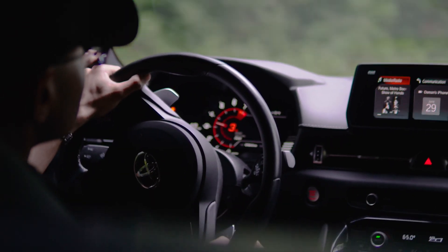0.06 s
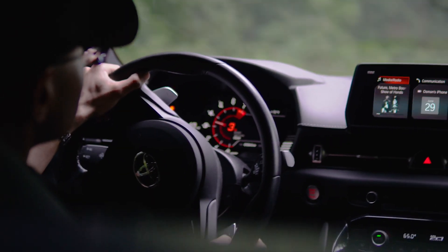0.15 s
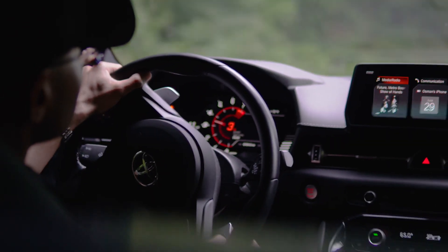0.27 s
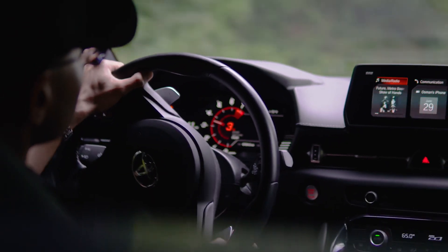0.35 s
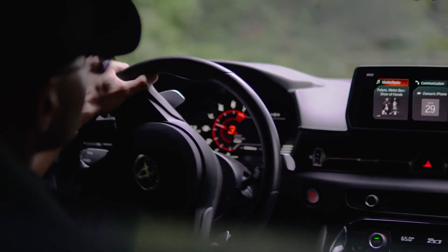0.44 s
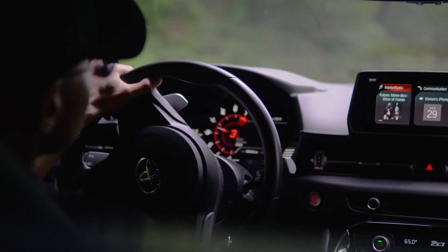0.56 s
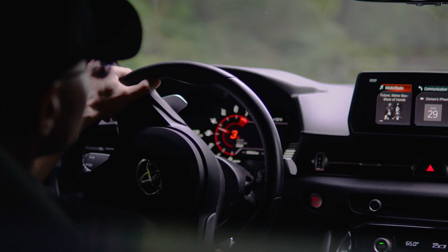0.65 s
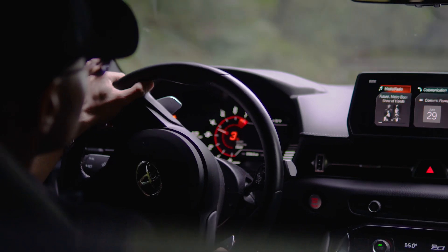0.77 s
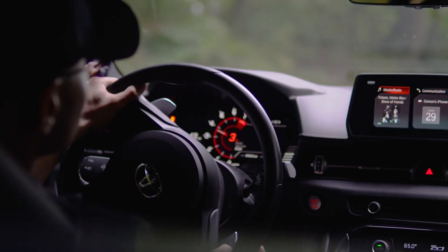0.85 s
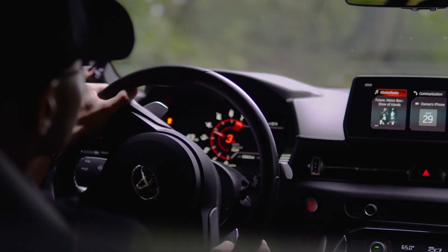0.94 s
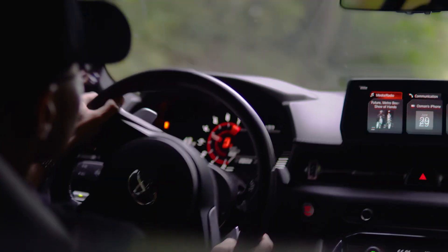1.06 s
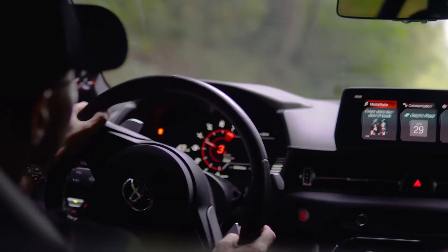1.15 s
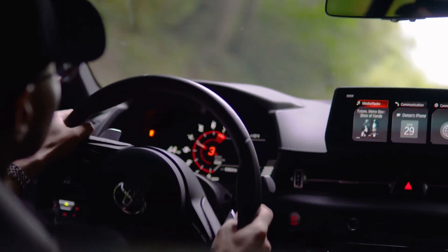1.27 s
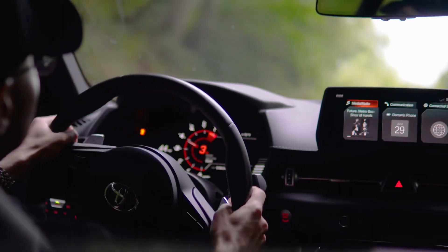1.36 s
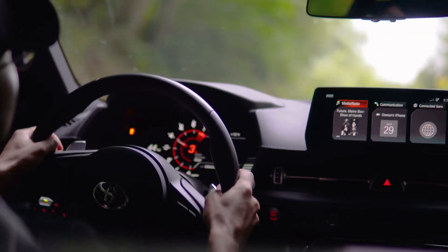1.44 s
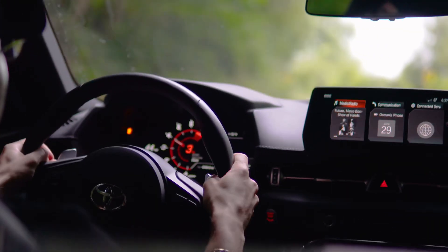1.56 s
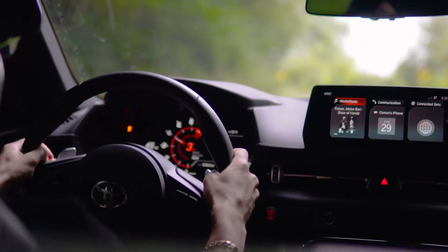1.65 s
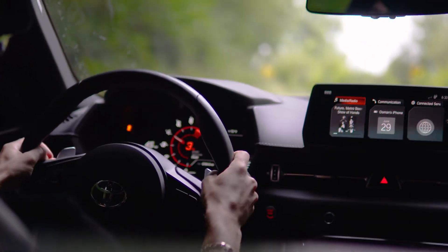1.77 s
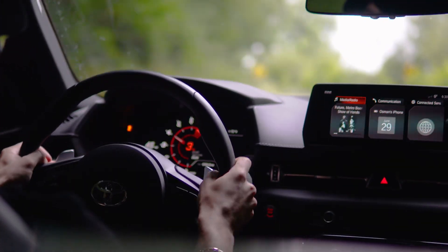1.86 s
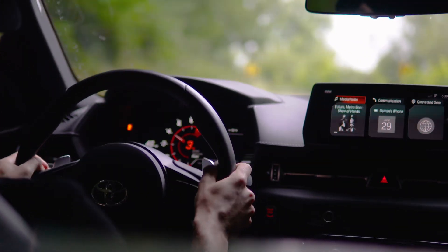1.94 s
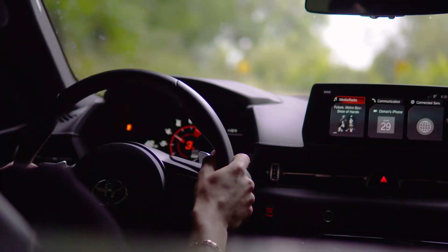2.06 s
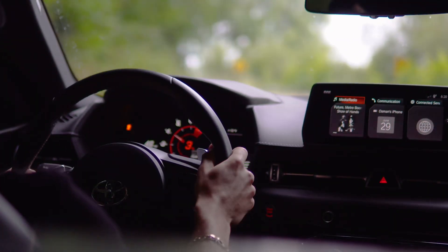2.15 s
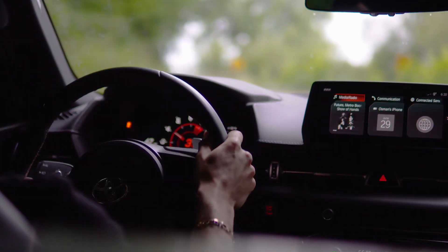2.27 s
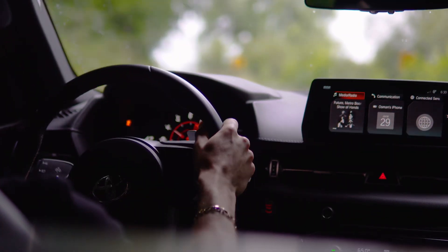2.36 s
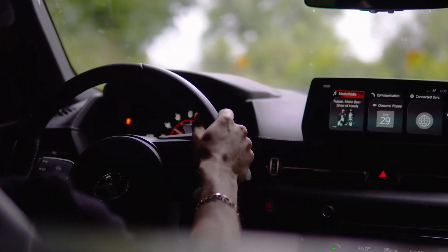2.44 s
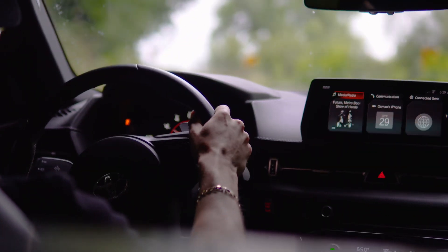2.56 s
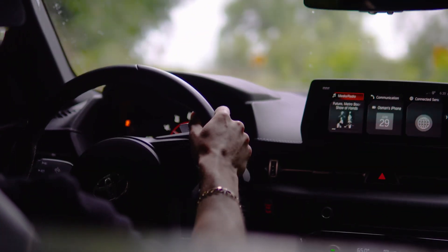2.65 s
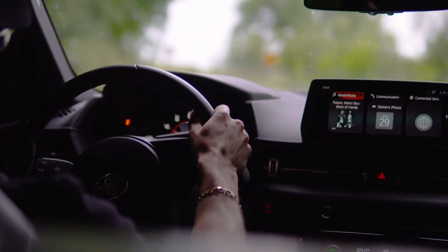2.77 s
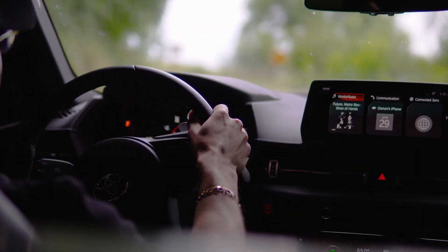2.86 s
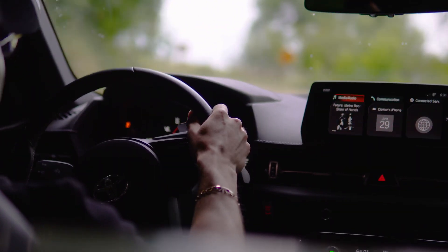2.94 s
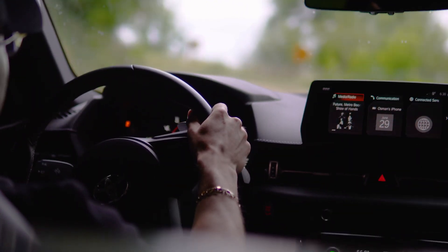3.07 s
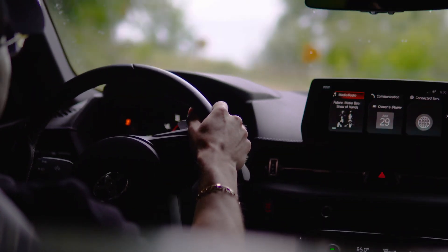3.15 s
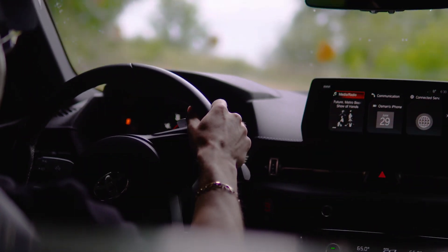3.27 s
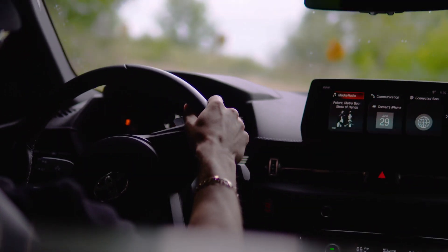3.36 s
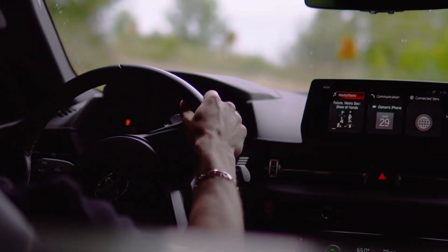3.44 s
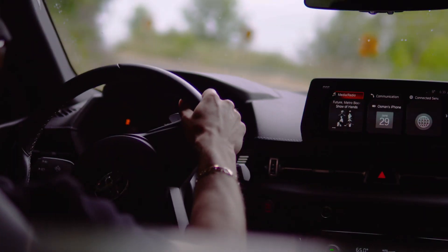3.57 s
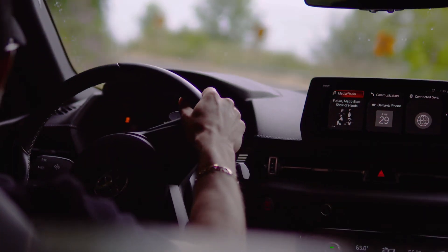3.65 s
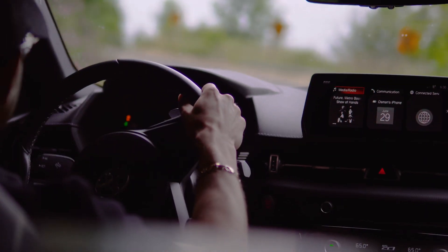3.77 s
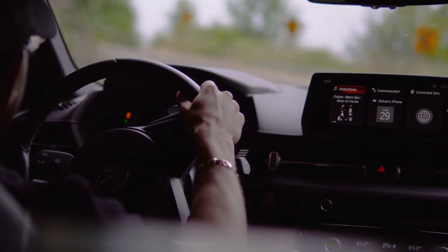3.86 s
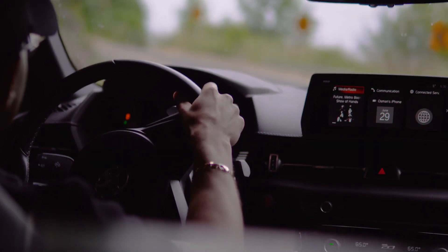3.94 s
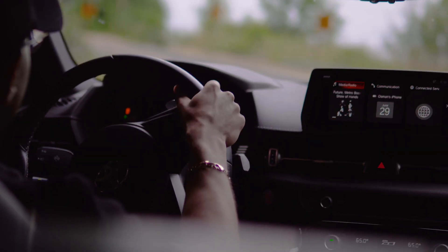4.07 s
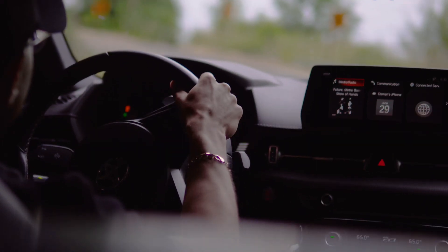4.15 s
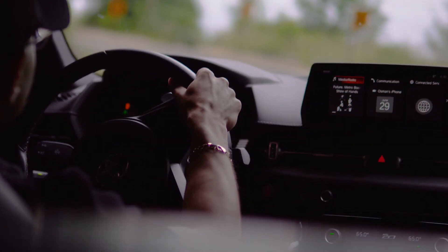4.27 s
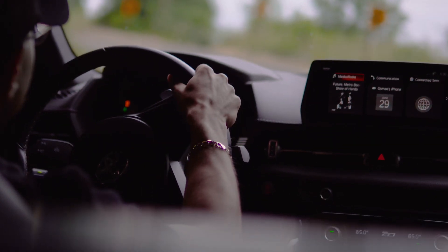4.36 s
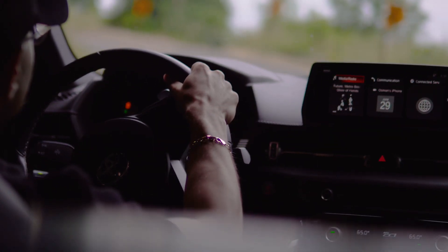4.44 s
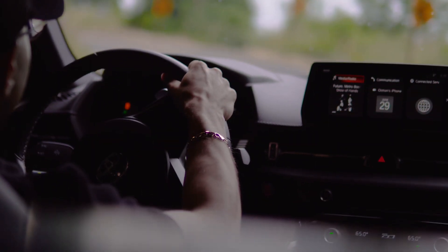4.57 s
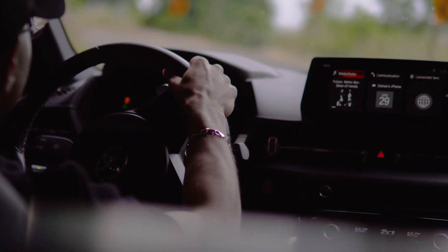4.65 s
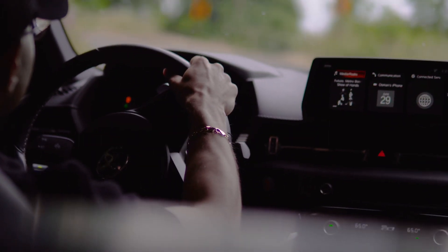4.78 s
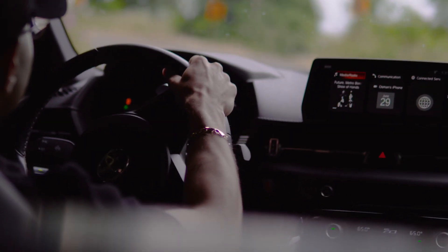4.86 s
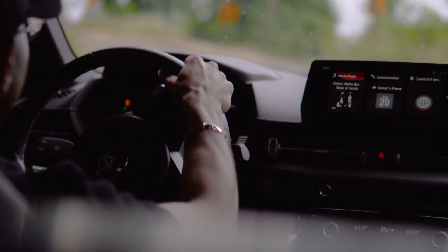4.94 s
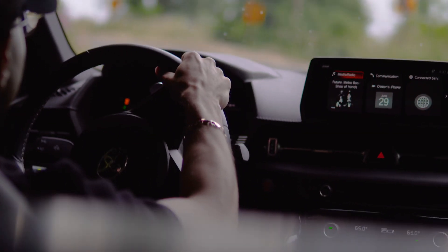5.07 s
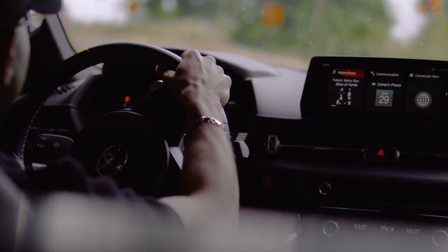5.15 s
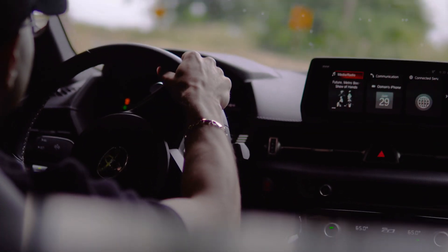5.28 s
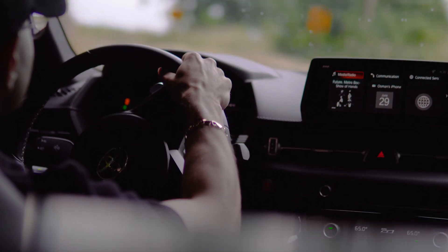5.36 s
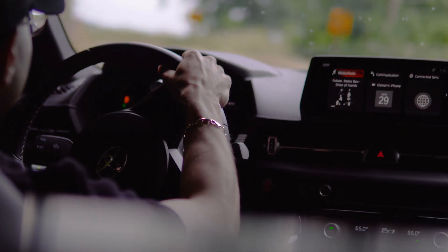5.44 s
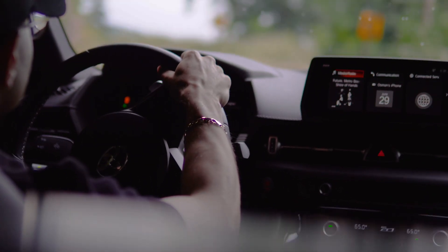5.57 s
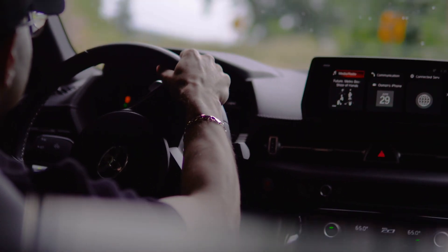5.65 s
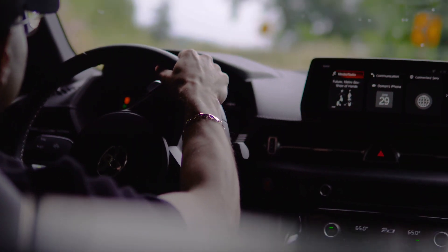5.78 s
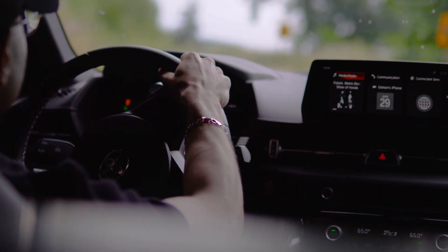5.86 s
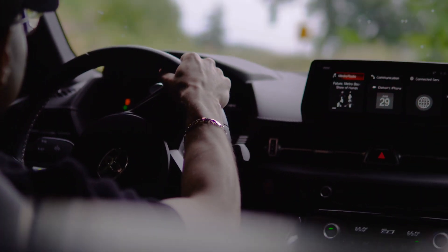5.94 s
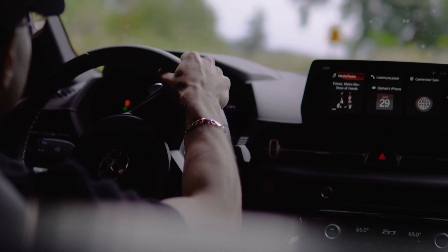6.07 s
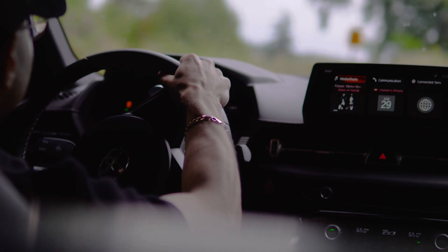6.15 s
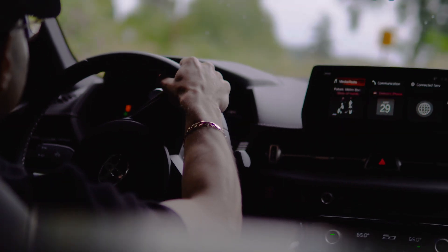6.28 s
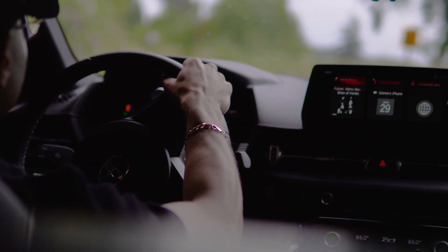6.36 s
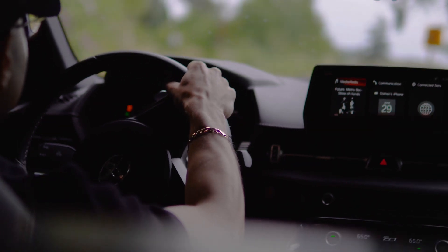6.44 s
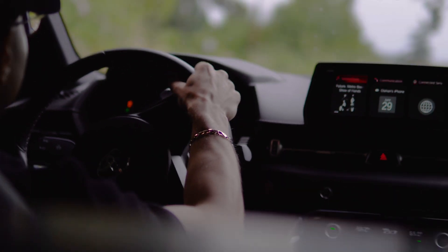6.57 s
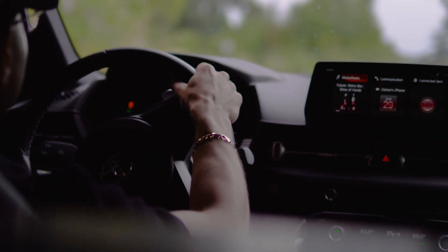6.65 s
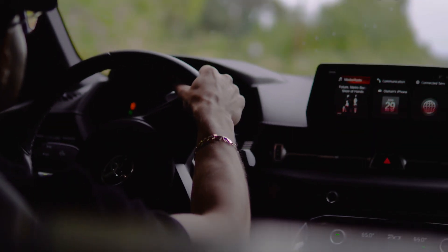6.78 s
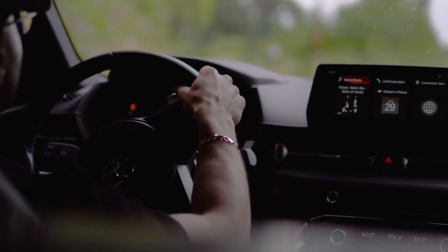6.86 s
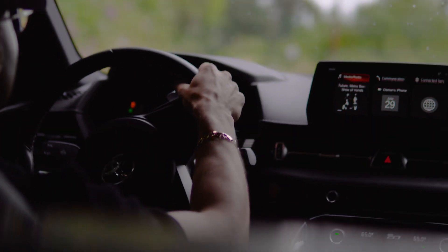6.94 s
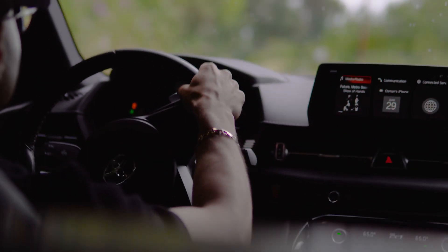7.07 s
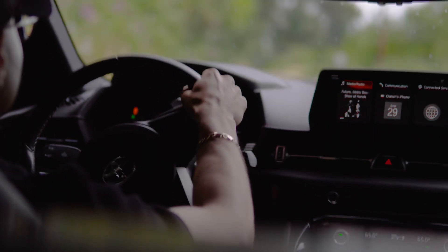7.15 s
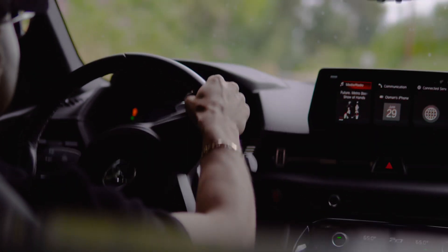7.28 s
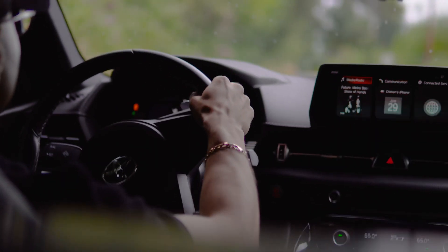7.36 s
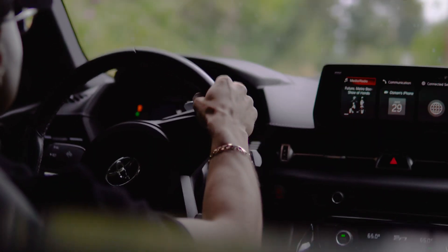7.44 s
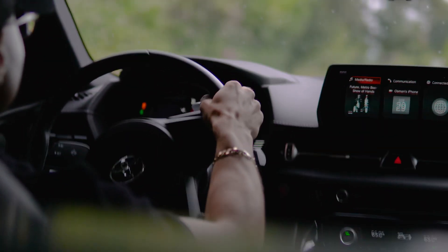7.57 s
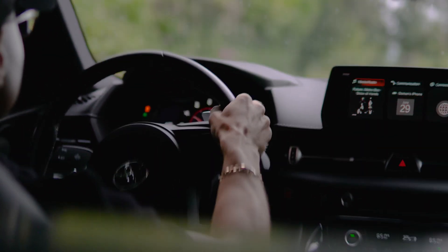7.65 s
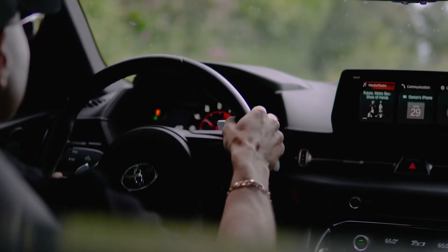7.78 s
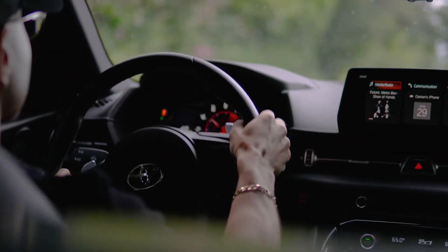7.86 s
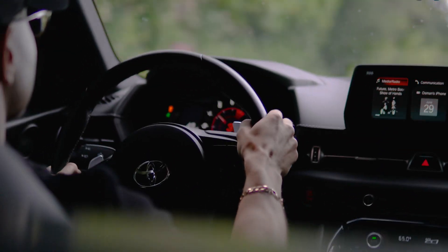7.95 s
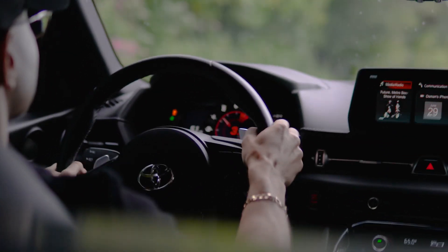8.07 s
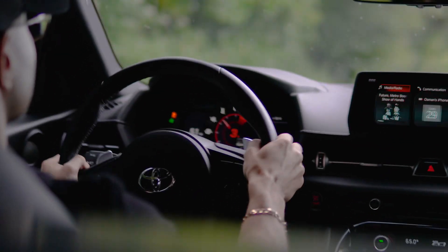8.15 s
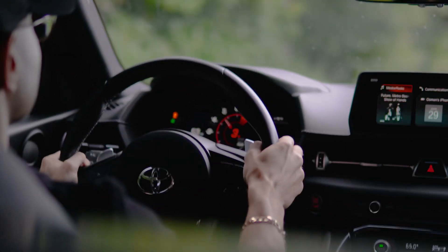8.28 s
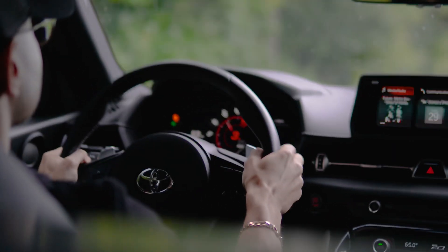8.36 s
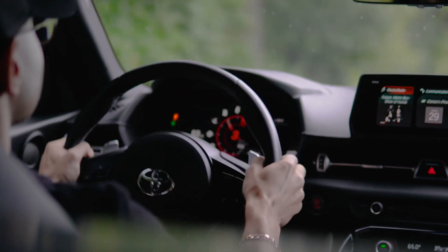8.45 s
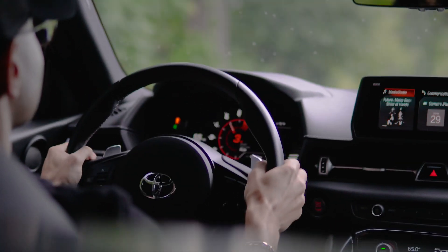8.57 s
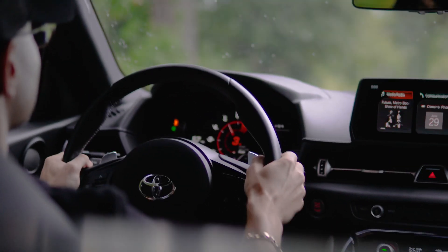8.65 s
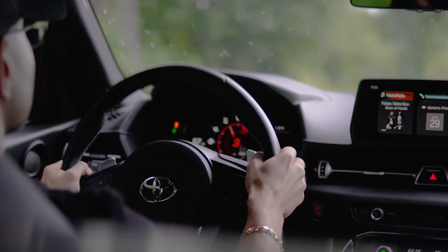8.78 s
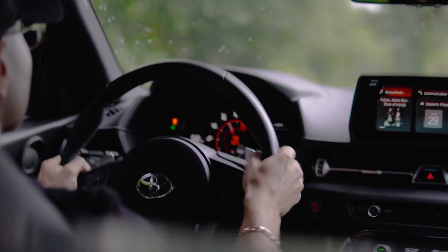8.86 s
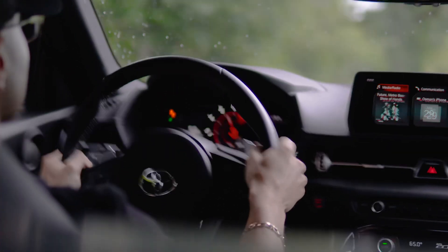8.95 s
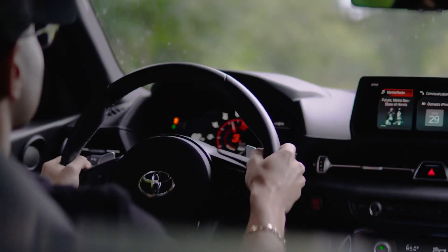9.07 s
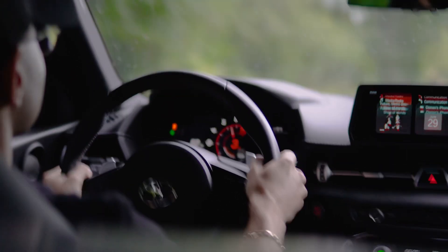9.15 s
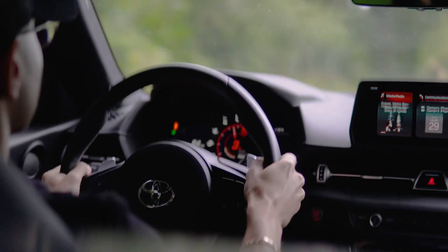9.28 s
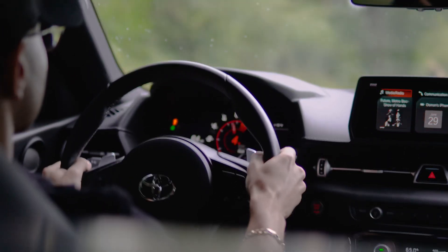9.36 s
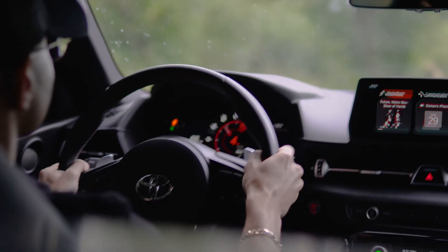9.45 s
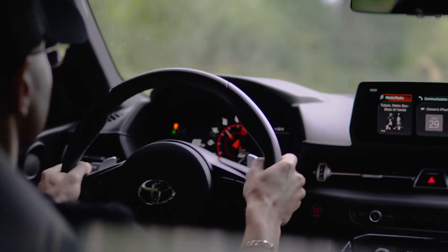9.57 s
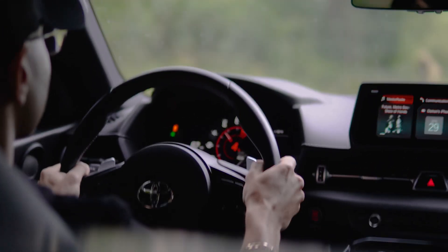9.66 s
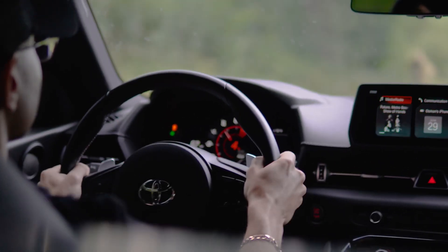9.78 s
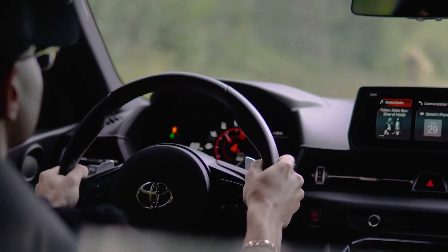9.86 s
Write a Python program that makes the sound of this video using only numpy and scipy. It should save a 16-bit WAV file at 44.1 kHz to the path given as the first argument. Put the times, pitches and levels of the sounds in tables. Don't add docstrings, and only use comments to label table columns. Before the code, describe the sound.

Close to the tailpipe of a turbocharged six-cylinder car on a road: quick pops and a falling note as an upshift ends, then a buzzy hum at part throttle. The tone fades to tyre and air rush with soft burbles while coasting, returns lightly, then builds into a loud, rising, rasping roar. A sharp burst of pops marks the next upshift, and the note drops and eases.

```python
import sys
import numpy as np
from scipy import signal
from scipy.fft import rfft, irfft, next_fast_len
from scipy.io import wavfile
from scipy.ndimage import uniform_filter1d

SR = 44100
rng = np.random.default_rng(int(sys.argv[2]) if len(sys.argv) > 2 else 0)


def store_wav(level_fs):
    pcm = np.round(np.clip(np.atleast_2d(level_fs), -1, 1) * 32767)
    wavfile.write(sys.argv[1], SR, pcm.T.astype(np.int16))


N = 437013

# frequency in Hz, level in dB per Hz.
ROAD_SPECTRUM = [(20, -51), (60, -31.5), (150, -11.5), (250, -6), (370, -6.5), (450, -11), (800, -11),
                 (1300, -15.5), (1900, -26.5), (2270, -15.5), (2550, -25.5), (3300, -38), (3700, -41),
                 (4100, -39), (9000, -53), (16000, -81)]
ROAR_SPECTRUM = [(20, -55), (60, -23), (120, -7), (300, -3), (450, -6.5), (750, 4), (1000, 2.5),
                 (1400, -7.5), (2000, -7.5), (2700, -9.5), (3400, -18), (4000, -34.5), (7000, -51.5),
                 (16000, -68.5)]
JET_SPECTRUM = [(300, -42), (1500, -3.5), (2700, 5), (3600, 0), (5000, -2.5), (7200, -8), (8000, -14),
                (10000, -15), (13000, -20.5), (16000, -24.5)]
SHELL_SPECTRUM = [(150, -36), (240, -16), (340, 4.5), (400, -1), (470, -31.5), (700, -57)]
HISS_SPECTRUM = [(20, 10), (100, 6), (1000, 0), (12000, -3), (16000, -4)]

# centre in Hz, width in Hz, level in dB.
PIPE_MODES = [(99, 100, -5.5), (319, 122, -2), (776, 560, -2), (2750, 800, -12.5)]
# centre in Hz, width in Hz, gain in dB.
CHAMBERS = [(2074, 172.7, -8.5), (2440, 100, 2), (3010, 91, -5.5), (3240, 250, 4), (3730, 120, -3),
            (6000, 400, -1.5), (6960, 460, 1), (7900, 150, 0.5), (9360, 360, 1), (10700, 400, -2.5)]
# frequency in Hz, gain in dB.
BOOM = [(180, -4), (203, 1), (260, 0), (295, -1.5)]
HONK = [(365, 3.5), (395, -3), (415, 1), (440, -16.5), (470, -6), (510, 1.5), (585, 5)]

# time in seconds, firing rate in Hz.
SPEED = [(0, 263.8), (.2, 206.6), (.34, 180), (.5, 184.4), (1.08, 189.6), (1.17, 194.6), (1.45, 194.9),
         (1.72, 199.6), (2.2, 203.1), (3.0, 199.5), (4.0, 191.4), (4.85, 193.8), (5.6, 190.1), (6.3, 189.2),
         (6.85, 193.8), (7.7, 214.5), (8.25, 242.3), (9.33, 291.9)]
# time in seconds, load (0 coast, 1 light, 2 part, 3 boost rising, 4 full).
THROTTLE = [(0, 2.5), (.35, 1.68), (1.2, 2.11), (2.1, 1.97), (2.3, 1.38), (2.45, 0.61), (2.75, 0.035),
            (3.95, 0.087), (4.15, 0.59), (4.4, 1.07), (5.3, 1.19), (5.5, 0.56), (6.35, 0.66), (6.55, 1.66),
            (7.15, 2.26), (7.3, 2.83), (7.85, 3.286), (8.1, 3.952)]
# middle in seconds, half length in seconds, load added.
DABS = [
    (.14, 0.066, -.9),
    (0.24, 0.042, 0.36),
    (3.303, 0.17, 0.34),
    (6.104, 0.15, 0.27),
    (7.716, 0.085, -0.32),
    (9.607, 0.034, -0.24),
    (9.9, 0.14, -1.85),
]
# start in seconds, end in seconds.
IGNITION_CUT = (9.459, 9.556)

LOAD_STEPS = [0, .5, 1, 2, 3, 4]
# firing tone in dB, its octave in dB, other orders in dB.
TONES_BY_LOAD = [(-48.5, -43, -38.5), (-36, -36.5, -38.5), (-30.5, -37, -34.5), (-27.5, -35.5, -27),
                 (-22.5, -36, -25), (-15, -24.5, -15.5)]
# roar in dB, jet hiss in dB, unburnt-fuel burble in dB.
GAS_BY_LOAD = [(-65.5, -72.5, -63), (-62, -71, -62.5), (-61, -72, -63.5), (-53.5, -67.5, -47.5),
               (-42, -52.5, -53), (-32, -35, -42)]
# multiple of the four-stroke cycle, share in dB at loads 0-1, 2, 3 and 4.
STRONG_ORDERS = [(3, -28, -34, -24, -22), (4, -29, -21, -15, -24), (7, -18, -19, -24, -26),
                 (8, -19, -23, -21, -19), (9, -17, -23, -20, -23), (10, -16, -21, -15, -21),
                 (11, -14, -23, -23, -26), (13, -26, -32, -27, -18), (14, -28, -25, -23, -16),
                 (16, -14, -20, -15, -15), (18, -9, -9, -9, -9), (19, -21, -17, -16, -20),
                 (20, -13, -4, -15, -12), (22, -21, -20, -12, -19), (23, -20, -19, -16, -16),
                 (24, -15, -13, -9, -18), (26, -13, -8, -7, -17), (28, -8, -17, -22, -22),
                 (30, -21, -24, -24, -24), (32, -18, -21, -13, -27), (34, -24, -22, -34, -29),
                 (36, -24, -25, -34, -29), (38, -25, -29, -23, -27), (15, -30, -31, -23, -25),
                 (17, -22, -20, -21, -24), (21, -20, -21, -24, -21), (25, -24, -26, -18, -23),
                 (27, -22, -29, -25, -24), (42, -27, -27, -37, -32)]
COAST_CHANGE = {8: 4, 14: 9, 22: 8, 24: -3, 28: -10, 30: -9, 36: -4, 38: -9}
# middle in seconds, half length in seconds, multiple, dB.
ORDER_SWELLS = [(9.9, .14, 20, -9), (9.9, .14, 16, 8), (8.12, .15, 20, -6), (8.02, .12, 24, 6),
                (7.5, .2, 18, 3), (7.75, .2, 26, 3), (.12, .07, 16, 11),          (4.75, .5, 18, 2.5),
                (2.45, .25, 28, -9), (8.02, .12, 18, -6), (2.5, .2, 22, 14.5), (2.2, .18, 18, 5),
                (9.9, .14, 32, -8), (9.9, .14, 28, -7), (5.25, .17, 24, 5), (5.25, .17, 18, 3),
                (5.25, .17, 36, 8), (9.9, .14, 26, -13), (9.9, .14, 24, -7), (.165, .028, 6, -6),
                (9.546, .008, 6, 6), (9.52, .02, 6, -4), (.13, .04, 24, 6), (.17, .03, 18, 5),
                (.23, .04, 20, -6), (.235, .03, 26, 5), (5.25, .17, 20, -10), (8.22, .2, 16, 7),
                (8.85, .14, 16, -8), (9.2, .22, 22, 5), (9.7, .1, 22, 7), (.45, .14, 22, 7),
                (9.68, .1, 20, -8), (8.6, .14, 24, 5), (8.2, .2, 28, 4), (9.22, .2, 28, -6),
                (9.7, .1, 28, 6), (6.5, .25, 32, -8), (6.15, .28, 26, -6), (8.2, .22, 9, 9),
                (8.72, .24, 10, -8), (9.25, .18, 10, 6), (8.1, .12, 30, 8), (9.68, .1, 16, 5),
                (5.49, .04, 12, -4), (5.94, .05, 12, -4), (5.84, .025, 12, 5), (6.18, .07, 12, 3),
                (9.15, .06, 12, -3), (9.36, .08, 12, 2), (9.37, .1, 18, -5)]

# start in seconds, count, first gap in seconds, peak in dB.
VOLLEYS = [
    (.0025, 6, .0113, -20.5),
    (9.468, 7, .0106, -6.6),
]
# time in seconds, peak in dB.
BACKFIRES = [(.069, -23), (.197, -24), (.208, -22), (.229, -22.5), (.239, -21.5), (.254, -23),
             (.266, -20.5), (4.127, -33), (7.9785, -11), (8.031, -12), (9.549, -10), (9.5575, -9.5),
             (9.579, -10)]
# middle in seconds, half length in seconds, level in dB.
BURBLES = [
    (2.66, .12, -49.5),
    (2.95, .1, -44.5),
    (3.35, 0.26, -48),
    (5.598, 0.39, -46.5),
    (6.12, .13, -48.5),
    (6.6, 0.079, -61),
]
# middle in seconds, half length in seconds, level in dB.
RASPS = [
    (7.22, .05, -46),
    (7.5, .2, -38),
    (7.95, .08, -34),
    (8.07, .045, -31),
    (9.1, .33, -32.5),
]
RASP_CYLINDERS_DB = [3.5, -4, 1, -4, 1, -4]
# firing rate in Hz, frequency stretch as a ratio.
RASP_TUNING = [(205, 1), (230, 1.06), (255, 1.05), (278, 1.09), (286, 1.22), (295, 1.24)]
RASP_STRETCHES = [1, 1.06, 1.12, 1.18, 1.24]

CYLINDERS, TOP_ORDER = 6, 44
UPSHIFT_S, UPSHIFT_LASTS_S, UPSHIFT_RATIO = 9.455, .135, .803
STUMBLE_S, STUMBLE_HALF_S, STUMBLE_HZ = 8.98, .0816, -3
CUT_DB, CUT_EDGE_S = -15, .01
WAKE_HZ, WAKE_DB_PER_HZ = 252.2, .16
WEAK_DB, WEAK_PEAK, WEAK_FALL_DB = -22.5, 19.6, .6
BEAT_ORDER = 24
CLUTCH_S, CLUTCH_HALF_S, CLUTCH_DB = .1, .1, -2.5
BITE_S, BITE_HALF_S, BITE_DB = .26, .054, 5.5
SPOOL_DB, SPOOL_S = -3.5, .45
LAG_S, LAG_HALF_S, LAG_DB = 7.38, .2, -3
SETTLE_S, SETTLE_HALF_S, SETTLE_DB = 8.17, .12, -2
BLOW_OFF_S, BLOW_OFF_HALF_S, BLOW_OFF_DB = 9.9, .09, 6
COOL_STRETCH, CHAMBERS_HZ = .934, 4500
FLOOD_HZ, FLOOD_SPAN_HZ, FLOOD_DEPTH = 264, 12, .45
GAP_GROWS_S = .00014
RASP_HZ, RASP_WIDTH_HZ, RASP_BRIGHT_HZ, RASP_BRIGHT_DB = 2540, 240, 3200, -8
FADE_S, TOP_HZ = .004, 15760


def amp(db):
    return 10 ** (np.asarray(db) / 20)


def unit(x):
    return x / np.sqrt(np.mean(x ** 2) + 1e-20)


def curves(rows):
    s, *cols = np.transpose(rows)
    return [np.interp(np.arange(N) / SR, s, c) for c in cols]


def bump(s, half):
    return np.exp(-((np.arange(N) / SR - s) / half) ** 4)


def wobble(rate):
    knots = rng.standard_normal(int(N * rate / SR) + 4)
    return np.interp(np.arange(N) * rate / SR, np.arange(len(knots)), knots)


def filtered(x, response):
    m = next_fast_len(N + SR // 2)
    return irfft(rfft(x, m) * response(np.fft.rfftfreq(m, 1 / SR)), m)[..., :N]


def coloured(x, spectrum):
    f, db = np.transpose(spectrum)
    return unit(filtered(x, lambda hz: amp(np.interp(np.log(hz + 1), np.log(f), db))))


def patchy(patchy_db):
    z = signal.stft(rng.standard_normal(N), nperseg=512)[2]
    field = uniform_filter1d(rng.standard_normal(z.shape), size=6, axis=0)
    field = uniform_filter1d(field, size=10, axis=1)
    return signal.istft(z * amp(patchy_db * unit(field)), nperseg=512)[1][:N]


def by_load(load, rows):
    return [np.interp(load, LOAD_STEPS, column) for column in np.transpose(rows)]


def driver():
    t = np.arange(N) / SR
    shifted = np.clip((t - UPSHIFT_S) / UPSHIFT_LASTS_S, 0, 1)
    firing_hz = curves(SPEED)[0] * UPSHIFT_RATIO ** shifted
    firing_hz = firing_hz + STUMBLE_HZ * bump(STUMBLE_S, STUMBLE_HALF_S)
    load = curves(THROTTLE)[0] + sum(more * bump(s, half) for s, half, more in DABS)
    return firing_hz, np.clip(load, 0, LOAD_STEPS[-1])


def road():
    lumps_db = .7 * wobble(2) + .9 * wobble(11)
    return amp(-40.5 + lumps_db) * coloured(patchy(patchy_db=.3), ROAD_SPECTRUM)


def burble(load):
    lumps = amp(1.3 * wobble(4) + 2.4 * wobble(9) + 2.4 * wobble(25))
    level = amp(by_load(load, GAS_BY_LOAD)[2])
    level = level + sum(amp(db) * bump(s, half) for s, half, db in BURBLES)
    return amp(4.5) * level * unit(lumps * coloured(rng.standard_normal(N), SHELL_SPECTRUM))


def pops():
    blows, spits = np.zeros(N + SR), np.zeros(N + SR)
    t = np.arange(SR // 50) / SR
    firings = list(BACKFIRES)
    for start, count, gap, db in VOLLEYS:
        for k in range(count):
            firings.append((start + k * (gap + k * GAP_GROWS_S), db + rng.normal(0, .6)))
    for s, db in firings:
        i = round(s * SR)
        blows[i:][:len(t)] += amp(1.2 * db + 19.5) * np.exp(-((t - .0004) / .00018) ** 2)
        spits[i:][:len(t)] += amp(3.5 * db + 6.5) * t / .0013 * np.exp(1 - t / .0013)

    def pipe(f):
        return sum((-1) ** k * amp(db) * 1j * f * w / (c * c - f * f + 1j * f * w)
                   for k, (c, w, db) in enumerate(PIPE_MODES))

    booms = filtered(blows[:N], lambda f: pipe(f) ** 2 * 1j * f / (50 + 1j * f))
    return booms + spits[:N] * coloured(rng.standard_normal(N), JET_SPECTRUM)


def rasp(firings):
    count = firings.astype(int)
    spread_db = 1.2 * rng.standard_normal(count[-1] + 2)[count]
    sizes = amp(np.array(RASP_CYLINDERS_DB)[count % CYLINDERS] + spread_db)
    puffs = (.2 + sizes * np.sin(np.pi * firings) ** 4) * rng.standard_normal(N)

    def peak(hz, centre):
        return np.exp(-((hz - centre) / RASP_WIDTH_HZ) ** 2)

    def ring(k):
        return filtered(puffs, lambda hz: peak(hz, k * RASP_HZ) + amp(RASP_BRIGHT_DB) * peak(hz, RASP_BRIGHT_HZ))

    stretch = np.interp(np.gradient(firings) * SR, *np.transpose(RASP_TUNING))
    rings = sum(np.interp(stretch, RASP_STRETCHES, share) * ring(k)
                for k, share in zip(RASP_STRETCHES, np.eye(len(RASP_STRETCHES))))
    return sum(amp(db) * bump(s, half) for s, half, db in RASPS) * unit(rings)


def gas_flow(firings, load):
    t = np.arange(N) / SR
    roar_db, jet_db, _ = by_load(load, GAS_BY_LOAD)
    count = firings.astype(int)
    cylinder_db = np.array([2.5, -1, -2, 1.5, -1.5, -1])[count % CYLINDERS]
    sizes = amp(cylinder_db + 1.8 * rng.standard_normal(count[-1] + 2)[count])
    puffs = sizes * np.sin(np.pi * firings) ** 2
    heat = np.clip(load - 2, 0, 1)
    swell_db, flutter_db = .29 * wobble(8), 1.2 * wobble(14)
    jet_db = jet_db + SPOOL_DB * np.exp(-t / SPOOL_S) + LAG_DB * bump(LAG_S, LAG_HALF_S)
    jet_db = jet_db + SETTLE_DB * bump(SETTLE_S, SETTLE_HALF_S)
    jet_db = jet_db + BLOW_OFF_DB * bump(BLOW_OFF_S, BLOW_OFF_HALF_S)
    cut_db = -3.1 * ((t > IGNITION_CUT[0]) & (t < IGNITION_CUT[1]))
    roar = coloured((.9 - .35 * heat + puffs) * patchy(patchy_db=1.5), ROAR_SPECTRUM)
    jet = coloured((2.2 + (.4 + .6 * heat) * puffs) * patchy(patchy_db=.73), JET_SPECTRUM)
    gas = amp(roar_db + 15 + swell_db + cut_db) * roar
    gas = gas + amp(jet_db + 9.5 + swell_db + 3 * cut_db + flutter_db) * jet

    def through_chambers(stretch, depth=1):
        def response(hz):
            gain_db = sum(db * np.exp(-((hz - c * (stretch if c < CHAMBERS_HZ else 1)) / w) ** 2)
                          for c, w, db in CHAMBERS)
            return amp(gain_db) ** depth
        return filtered(gas, response)

    flood = np.clip((np.gradient(firings) * SR - FLOOD_HZ) / FLOOD_SPAN_HZ, 0, 1)
    hot = (1 - flood) * through_chambers(1.01) + flood * through_chambers(.99, FLOOD_DEPTH)
    return heat * hot + (1 - heat) * through_chambers(COOL_STRETCH)


def order_shares():
    shares = {k: [WEAK_DB - WEAK_FALL_DB * abs(k - WEAK_PEAK)] * 4 for k in range(2, TOP_ORDER + 1)}
    shares.update({k: share_db for k, *share_db in STRONG_ORDERS})
    return [(k, share_db) for k, share_db in sorted(shares.items()) if k not in (CYLINDERS, 2 * CYLINDERS)]


def order_swell(order):
    return sum(db * bump(s, half) for s, half, multiple, db in ORDER_SWELLS if multiple == order)


def engine_orders(firings, firing_hz, load):
    t = np.arange(N) / SR
    cut_db = CUT_DB * np.clip(np.minimum(t - IGNITION_CUT[0], IGNITION_CUT[1] - t) / CUT_EDGE_S, 0, 1)
    firing_db, octave_db, others_db = by_load(load, TONES_BY_LOAD) + cut_db
    full = np.clip(load - 3, 0, 1)
    firing_db = firing_db + np.interp(firing_hz, *np.transpose(BOOM)) + order_swell(6)
    octave_db = octave_db + np.interp(2 * firing_hz, *np.transpose(HONK)) + order_swell(12)
    octave_db = octave_db + BITE_DB * bump(BITE_S, BITE_HALF_S)
    others_db = others_db + CLUTCH_DB * bump(CLUTCH_S, CLUTCH_HALF_S)
    others_db = others_db + full * WAKE_DB_PER_HZ * np.minimum(firing_hz - WAKE_HZ, 0)
    phase = 2 * np.pi * firings
    tones = amp(firing_db + .6 * wobble(14)) * np.sin(phase)
    tones += amp(octave_db + 1.9 * wobble(14)) * np.sin(2 * phase - .8)
    rough = np.interp(load, [0, 1, 2, 3, 4], [1.5, .55, .5, .7, 1.8])
    for k, share_db in order_shares():
        unsteady = rough * (.3 if k % CYLINDERS == 0 else 1.7 if k % 2 else .9)
        level_db = others_db + 9.5 * full / (1 + ((k / CYLINDERS * firing_hz - 770) / 60) ** 2)
        level_db = level_db + order_swell(k) + COAST_CHANGE.get(k, 0) * np.clip(1 - 2 * load, 0, 1)
        level_db = level_db + np.interp(load, [1, 2, 3, 4], share_db)
        level_db = level_db + 2.2 * np.minimum(unsteady, 1.4) * wobble(7)
        in_step = k >= BEAT_ORDER and k % 2 == 0
        drift = rng.uniform(0, 2 * np.pi) * (.1 if in_step else 1) + .3 * unsteady * wobble(13)
        tones += amp(level_db) * np.sin(k / CYLINDERS * phase + drift)
    return np.sqrt(2) * tones


def scene():
    firing_hz, load = driver()
    firings = np.cumsum(firing_hz) / SR
    car = road() + burble(load) + pops() + rasp(firings)
    car = car + gas_flow(firings, load) + engine_orders(firings, firing_hz, load)
    return np.array([car, np.zeros(N)])


def record(dry):
    rounded = dry[0] / (1 + np.abs(dry[0] / .85) ** 4) ** (1 / 4)
    left = np.minimum(np.arange(N) / SR / FADE_S, 1) * rounded
    leak = filtered(left, lambda hz: amp(-62) * np.exp(-.5j) / (1 + 1j * hz / 450))
    hiss = amp(-85) * coloured(rng.standard_normal(N), HISS_SPECTRUM)
    return filtered(np.array([left, leak + hiss]), lambda hz: hz < TOP_HZ)


dry = scene()
out = record(dry)
store_wav(out)
```